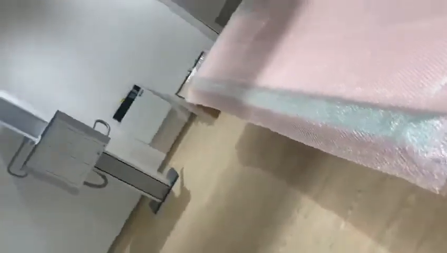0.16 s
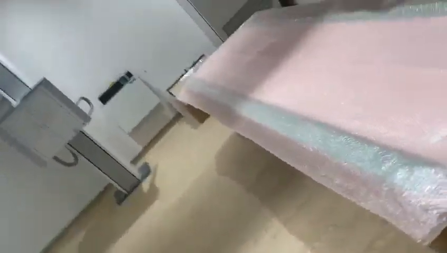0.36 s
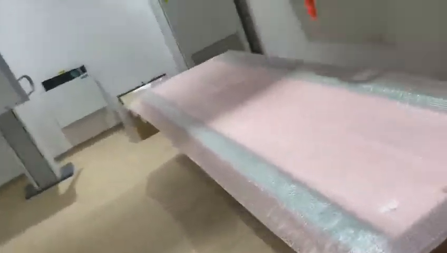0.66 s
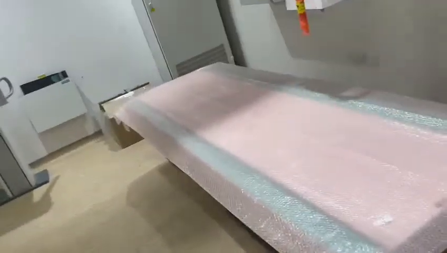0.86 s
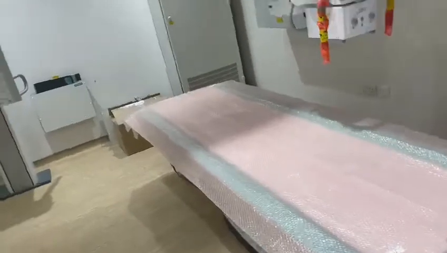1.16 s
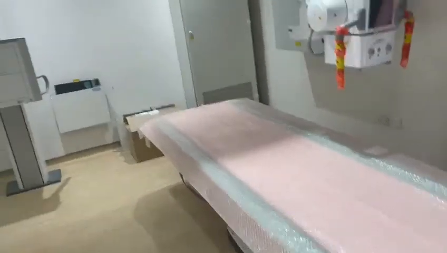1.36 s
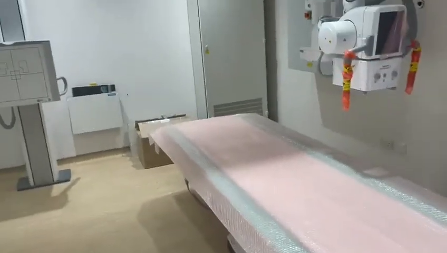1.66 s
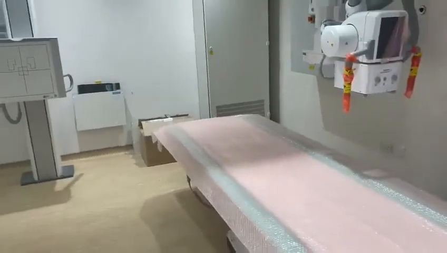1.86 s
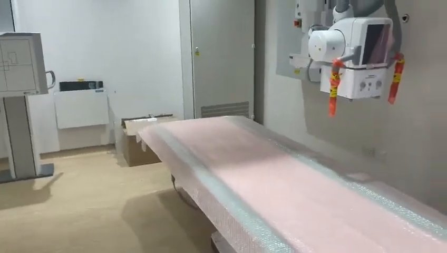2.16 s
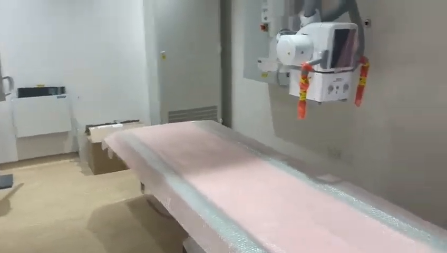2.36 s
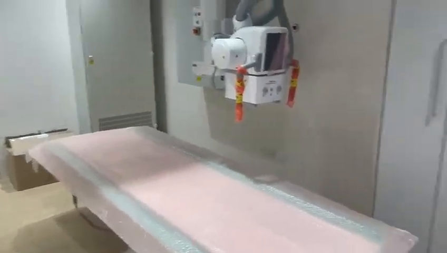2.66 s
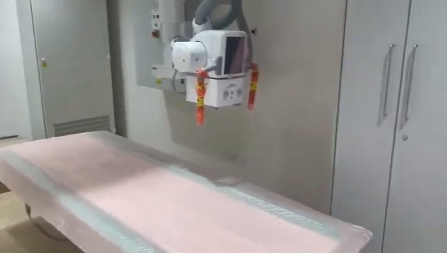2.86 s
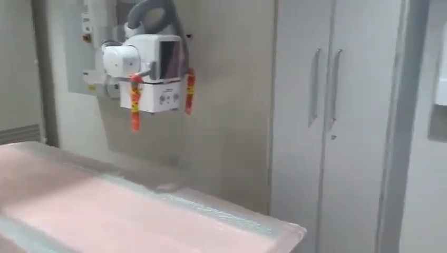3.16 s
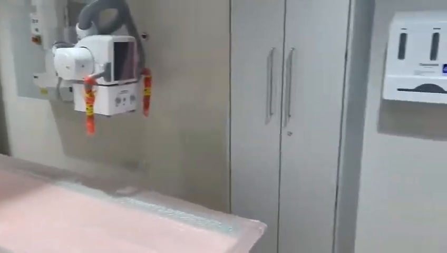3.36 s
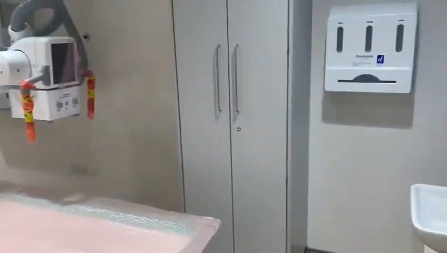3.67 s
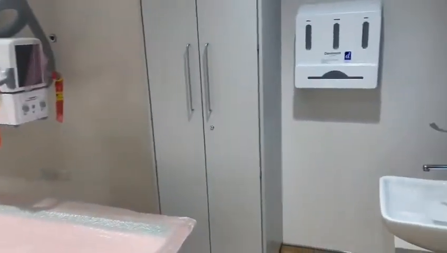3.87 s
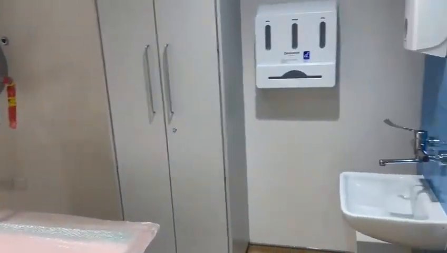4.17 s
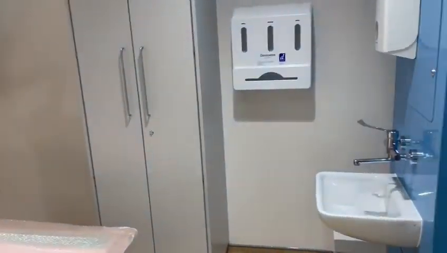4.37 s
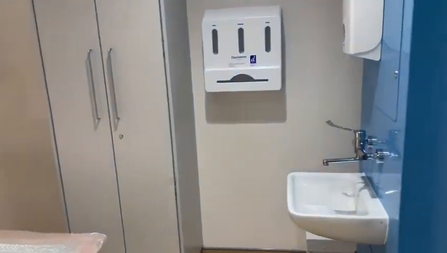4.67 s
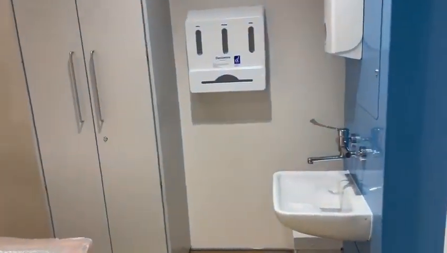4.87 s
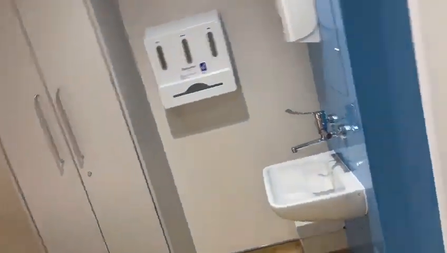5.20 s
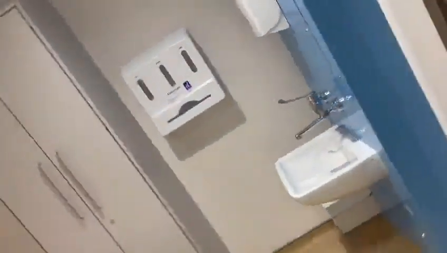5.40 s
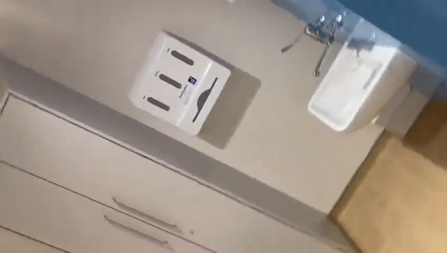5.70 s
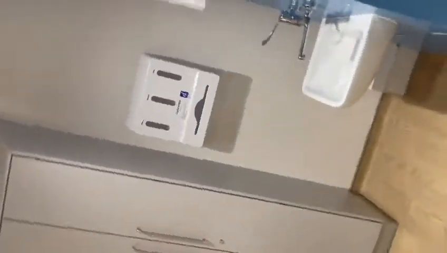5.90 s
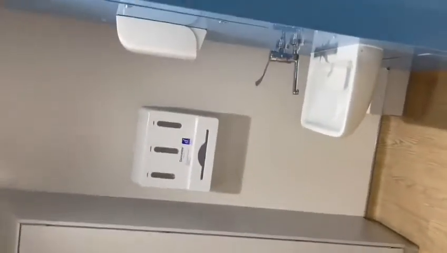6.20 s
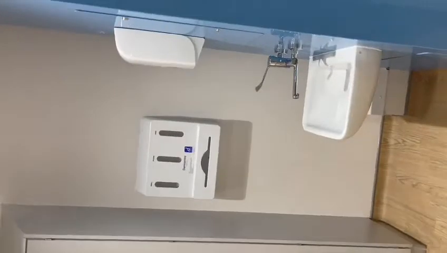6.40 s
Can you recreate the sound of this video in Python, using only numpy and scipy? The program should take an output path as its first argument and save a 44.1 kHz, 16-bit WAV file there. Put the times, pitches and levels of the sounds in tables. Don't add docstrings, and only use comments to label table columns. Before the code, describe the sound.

In a quiet hard-walled treatment room, cloth rustles and a phone case pops softly before a door bangs shut, followed by a few small clicks.

```python
import sys
import numpy as np
from scipy import signal
from scipy.fft import rfft, irfft, next_fast_len
from scipy.io import wavfile
from scipy.ndimage import uniform_filter1d, minimum_filter1d

SR = 44100
rng = np.random.default_rng(int(sys.argv[2]) if len(sys.argv) > 2 else 0)


def rack_gain(trim_db):
    fader = np.asarray(trim_db, float)
    return 10 ** (fader / 20)


def generate_wav(sig):
    pcm = np.round(np.clip(np.atleast_2d(sig).T, -1, 1) * 32767).astype(np.int16)
    wavfile.write(sys.argv[1], SR, pcm)


N = 288546

# time_s, level_db
AIR_LEVEL = [(0.0, -45.5), (1.0, -46.5), (2.4, -46.5), (3.6, -45), (4.8, -43), (5.2, -42), (6.54, -43.5)]
# pitch_hz, level_db (per Hz)
AIR_COLOUR = [(35, -33), (60, -1), (102, -1), (134, 0), (173, -10), (209, -7.5), (601, -15), (1290, -16.5),
              (1810, -30.5), (3340, -47), (4480, -62), (5310, -85.5), (9400, -82), (12200, -109),
              (20700, -120)]
# pitch_hz, width_hz, level_db
DUCT_HUMS = [(136.6, 26, 0.5), (210.4, 17.6, -3.5), (258.4, 29, -10), (325, 42, -17)]
AIR_MIDDLE_DB = -11.5

# start_s, length_s, level_db, brightness_db
SLEEVE_STROKES = [(0.0, 2.28, -76.5, -3.5), (2.305, .3, -81, -20), (2.6, 1.08, -85, -20),
                  (5.18, 1.32, -74, -1.5), (0.0, .06, -68, -5), (.197, .01, -72, -3), (0.31, .06, -70, 1),
                  (0.402, .02, -62.5, -2), (0.52, .045, -64, -1), (0.604, .07, -60.5, -1),
                  (0.807, .03, -68.5, -2), (0.873, .29, -71, 0), (1.254, .055, -63.5, -2.5),
                  (1.408, .09, -59, -5), (1.568, .015, -61.5, -2.5), (1.783, 0.14, -65, -7),
                  (1.96, .31, -73.5, -6), (2.726, .19, -73, -25), (2.86, .04, -73, -25),
                  (5.26, 0.045, -61.5, 2), (3.646, .03, -74, -1), (4.886, .005, -90, -20),
                  (5.219, .19, -60.5, 0), (5.43, .39, -65, -3.5), (5.835, .025, -59.5, -2.5),
                  (5.99, .035, -57.5, -6), (6.126, .015, -70.5, 0), (6.247, .02, -65, -3),
                  (6.34, .07, -67.5, -2.5), (6.42, .055, -59.5, -4.5)]
SLEEVE_RISE_DB_S, SLEEVE_FALL_DB_S, STILL_DB = 400, 330, -112
COARSE_DB, COARSE_SHARE, USUAL_DB, FAINT_DB = -1.5, 0.59, -68, -88
# start_s, length_s, level_db
GRIP_SHIFTS = [(.05, 0.018, -41), (.18, 0.074, -42), (.57, 0.025, -42.5), (.74, 0.1, -38.5),
               (.985, 0.0067, -33.5), (1.14, 0.068, -38), (1.28, 0.095, -33.5), (1.49, .03, -36),
               (1.77, 0.12, -35.5), (2.1, 0.061, -47.5), (2.29, .01, -46), (2.43, .06, -48),
               (2.8, .02, -49), (3.12, 0.08, -42), (3.33, .6, -45.5), (4.6, 0.12, -41.5), (4.94, .3, -48),
               (5.36, .01, -51), (5.53, .07, -45), (5.84, .02, -45), (6.02, .03, -44), (6.4, .08, -49)]
GRIP_RISE_DB_S, GRIP_FALL_DB_S = 161, 140

# start_s, level_db, end_pitch_hz, length_s, left_minus_right_db
CASE_SNAPS = [
    (0.1787, -37, 4200, 0.0003, -5),
    (.1786, -40, 1300, .0012, 5),
    (.179, -38.5, 580, 0.0073, 3),
    (.2438, -36.5, 4000, 0.0003, 4),
    (0.2437, -28.5, 1070, 0.001, 1),
    (.2437, -24.5, 300, 0.0059, 3),
    (0.2508, -25, 80, 0.019, 0),
    (5.565, -18, 490, 0.0095, 3.5),
    (6.016, -39.5, 810, 0.0068, -9),
    (6.022, -41, 2300, .0004, 5),
]
# start_s, level_db, end_pitch_hz, length_s, left_minus_right_db
CASE_TICKS = [
    (1.2552, -31, 560, 0.0069, 7),
    (1.2545, -38, 920, 0.0029, 5),
    (5.566, -43, 2640, 0.0021, -3),
    (5.5661, -33.5, 1620, 0.0024, 14),
    (5.717, -41, 860, .005, -3),
    (5.728, -37.5, 590, 0.0074, 11),
    (6.262, -37, 1760, 0.0026, 16),
    (6.2618, -44, 3500, 0.0012, -1),
    (6.262, -43, 2500, 0.0035, -7),
]
SNAP_FALL, TICK_FALL = 3.1, 1.4
POP_LAG_S = 0.00027

# start_s, crack_db, brightness_db (per octave), ring_db, thud_db
DOOR_BLOWS = [(3.845, -51.5, -3, -76, -57), (3.854, -46.5, 3.8, -49.5, -60.5),
              (3.883, -54, -10, -64.5, -57.5), (4.036, -48, 1.5, -55, -48),
              (4.055, -36, -4.5, -45.5, -43.5), (4.065, -51.5, 0.5, -56, -23), (4.099, -43, 4, -35, -43.5),
              (4.1046, -38, -4, -29.5, -39.5), (4.1082, -15, 1.5, -22.5, -28.5),
              (4.111, -29, -2.5, -20.5, -33), (4.1164, -22.5, -6.5, -21.5, -15.5),
              (4.127, -34, -6.5, -44.5, -6.5), (4.154, -34, -4, -36, -23.5),
              (4.198, -39.5, -3.5, -39.5, -20), (4.229, -41, -1.5, -44, -20.5),
              (4.241, -38.5, 0.5, -43.5, -14)]
# time_s, level_db
SEAL_SCRAPE = [
    (4.008, -78),
    (4.034, -43),
    (4.045, -52),
    (4.06, -40),
    (4.09, -49),
    (4.105, -50.5),
    (4.115, -91.5),
]
# pitch_hz, level_db
CRACK_COLOUR = [(150, -22.5), (260, 12), (450, 10.5), (750, 7.5), (1100, 16), (1900, 5), (2300, -3.5),
                (3000, -5), (4000, -2.5), (5000, -2), (6800, -5), (8800, -0.5), (10500, -4.5), (11800, -8)]
# pitch_hz, level_db, t60_s (time to fade by 60 dB)
BOOM_MODES = [(52.7, -22, .3), (61.75, -4.5, 0.73), (71.7, -6.5, 0.46), (82.6, -12.5, 0.43),
              (90.1, 1.5, 0.39), (129.5, -3, 0.43), (142.9, -5, .3), (150.2, -6.5, .45), (183, -10, 0.29),
              (208.7, -4.5, 0.29), (247, 6.5, 0.13)]
# pitch_hz, level_db, t60_s
RING_MODES = [(250, 3.5, 0.078), (381, 0, 0.05), (450, -5, .05), (565, -3, 0.08), (920, -9.5, 0.12),
              (1019, -6, .08), (1108, -7, .08), (1226, -10, 0.16), (1540, -8, .14), (1643, -5, .09),
              (1716, -5, 0.1), (1815, -7, 0.07), (2968, -11.5, 0.066), (8676, -9, 0.08)]
# pitch_hz, t60_s
ROOM_T60 = [(150, 0.48), (500, 0.78), (1200, 0.19), (3000, 0.56), (6000, 0.47), (9000, 0.31), (11500, .33)]
RING_TO_ROOM_DB, ECHO_DB = -18, 0.5
PUSH_S = 0.006
CRACK_S, CRACK_DOUBLES_DB = 0.0067, 22

# pitch_hz, mid_db, side_db
PORTS = [(60.3, -3.5, -34.5), (177, 0.5, -20.5), (347, 1.5, -4.5), (706, -1.5, -1), (1606, 0.5, -3),
         (2600, 2.5, -1), (4030, -1, -9), (5500, 0, -3), (6500, -2, -19.5), (7470, -5.5, -6.5),
         (8330, 0, -40.5), (8760, 2, -30.5), (9220, -1.5, -8.5),
         (9600, -2, 1), (9850, -27, 2), (10400, -27, 3), (10650, -2, 2), (11250, -1, -2),
             (11400, -2, -35), (11600, -9, -50), (12100, -50, -60)]
# pitch_hz, share (of the time)
SIDE_KEPT = [(1800, 1), (2600, .8), (3600, .5), (4500, .35), (5500, .6), (6600, .2), (7600, 0.71),
             (8300, .3), (9200, 0.94)]
TOP_HZ, TOP_MASK_DB = 9680, -42
CEILING = 0.9


def shaped(x, hz, db):
    size = next_fast_len(x.shape[-1])
    f = np.log(np.fft.rfftfreq(size, 1 / SR) + 1)
    gain = rack_gain(np.interp(f, np.log(hz), db))
    return irfft(rfft(x, size) * gain, size)[..., :x.shape[-1]]


def unit(x):
    return x / np.sqrt(np.mean(x ** 2))


def band(hz, width, size=N):
    b, a = signal.iirpeak(hz, hz / width, SR)
    once = signal.lfilter(b, a, rng.standard_normal((2, size)))
    return unit(signal.lfilter(b, a, once))


def walk(rate):
    k = int(SR / rate)
    steps = np.repeat(rng.standard_normal(N // k + 1), k)
    return 1.3 * uniform_filter1d(uniform_filter1d(steps, k), k)[:N]


def curves(table):
    s, *columns = np.transpose(table)
    return [np.interp(np.arange(N) / SR, s, c) for c in columns]


def strokes(table, rise_db_s, fall_db_s, extra_db=0):
    t = np.arange(0, N + 64, 64) / SR
    s, length, db = np.transpose(table)[:3, :, None]
    rise = rise_db_s * np.maximum(s - t, 0)
    fall = fall_db_s * np.maximum(t - s - length, 0)
    power = np.sum(rack_gain(db + extra_db - rise - fall) ** 2, axis=0) + rack_gain(STILL_DB) ** 2
    return np.interp(np.arange(N) / SR, t, 10 * np.log10(power))


def modes(table):
    t = np.arange(SR) / SR
    return sum(rack_gain(db) * np.sin(2 * np.pi * hz * t) * rack_gain(-60 * t / t60) for hz, db, t60 in table)


def air():
    level_db, = curves(AIR_LEVEL)
    hz, db = np.transpose(AIR_COLOUR)
    rush = []
    for h in 75 * 2 ** np.arange(0, 7.6, .5):
        gain = rack_gain(np.interp(np.log(h), np.log(hz), db) + 1.13 * walk(4.82)) * np.sqrt(h)
        rush.append(gain * band(min(h, 11500), h / 2.11))
    duct = sum(rack_gain(g_db + 2.0 * walk(4.1)) * band(f, width) for f, width, g_db in DUCT_HUMS)
    bass = unit(sum(rush[:6])) * rack_gain(-2) + duct * rack_gain(-4.5)
    upper = unit(sum(rush[6:])) * rack_gain(AIR_MIDDLE_DB)
    return (bass + upper) * rack_gain(level_db)


def hand():
    db = strokes(SLEEVE_STROKES, SLEEVE_RISE_DB_S, SLEEVE_FALL_DB_S)
    brightness_db = np.array(SLEEVE_STROKES)[:, 3:]
    top_db = strokes(SLEEVE_STROKES, SLEEVE_RISE_DB_S, SLEEVE_FALL_DB_S, brightness_db) - db
    low_db = COARSE_DB - COARSE_SHARE * (np.maximum(db, FAINT_DB) - USUAL_DB)
    moving = 1 - curves([(3.8, 0), (3.84, 1), (4.5, 1), (4.6, 0)])[0]
    slips = rack_gain(1.9 * walk(30) + 2.0 * rng.exponential(size=N))
    low = sum(band(hz, hz / 2) * rack_gain(2 * walk(7.5)) for hz in (1900, 3000, 4300)) * rack_gain(low_db - 3)
    fine_bands = ((6100, -6.0), (7600, 0.0), (8800, -16.0), (10600, 6.0 + np.maximum(top_db, -25)))
    high = sum(band(hz, hz / 4) * rack_gain(1.86 * walk(12) + g_db) for hz, g_db in fine_bands)
    grip_db = strokes(GRIP_SHIFTS, GRIP_RISE_DB_S, GRIP_FALL_DB_S) - 4.5
    thumps = (band(48, 30) + band(80, 50)) * rack_gain(grip_db)
    return (low + high) * unit(slips) * rack_gain(db) * moving + thumps


def pops():
    out = np.zeros((2, N))
    for table, fall in ((CASE_SNAPS, SNAP_FALL), (CASE_TICKS, TICK_FALL)):
        for s, db, end_hz, length, pan_db in table:
            u = np.arange(int(length * SR)) / (length * SR)
            hz = end_hz * (1 + (fall - 1) * (1 - u) ** 3.06)
            swell = np.sin(np.pi * u ** 0.8)
            pop = rack_gain(db) * swell * np.sin(2 * np.pi * np.cumsum(hz) / SR)
            for k, sign in enumerate((1, -1)):
                i = int((s + k * POP_LAG_S) * SR)
                out[k, i:i + len(u)] += pop * rack_gain(sign * pan_db / 2)
    return out


def echo():
    t = np.arange(SR) / SR
    f, t60 = np.transpose(ROOM_T60)
    hz = 150 * 2 ** np.arange(0, 6.6, .5)
    decay = np.interp(np.log(hz), np.log(f), t60)
    tail = sum(np.sqrt(h) * band(h, h / 2, size=SR) * rack_gain(-60 * t / d) for h, d in zip(hz, decay))
    tail = tail * (1 - np.exp(-t / 0.0032))
    return tail / np.sqrt(np.sum(tail[0] ** 2))


def door():
    t = np.arange(2048) / SR
    crack = rack_gain(curves(SEAL_SCRAPE)[0] + 3 * walk(150)) * rng.standard_normal((2, N))
    send, tap, push = crack.copy(), np.zeros(N), np.zeros(N)
    hardest_db = max(blow[1] for blow in DOOR_BLOWS)
    push_shape = np.sin(np.pi * np.minimum(t / PUSH_S, 1)) ** 2 * 2 / (PUSH_S * SR)
    for s, db, tilt_db, ring_db, thud_db in DOOR_BLOWS:
        i = int(s * SR)
        length = CRACK_S * 2 ** ((db - hardest_db) / CRACK_DOUBLES_DB)
        noise = rng.standard_normal((2, len(t)))
        click = np.sqrt(length * SR / 2) * (np.arange(len(t)) == 32)
        burst = np.vstack([noise * np.exp(-t / length), click])
        burst = rack_gain(db) * shaped(burst, [500, 16000], [0, 5 * tilt_db])
        crack[:, i:i + len(t)] += burst[:2]
        send[:, i:i + len(t)] += burst[2]
        tap[i] += rack_gain(ring_db)
        push[i:i + len(t)] += rack_gain(thud_db) * push_shape
    ring = signal.fftconvolve(tap, modes(RING_MODES))[:N]
    ring = np.array([ring, -1.2 * np.roll(ring, shift=8)])
    crack, send = shaped(np.array([crack, send]), *np.transpose(CRACK_COLOUR))
    wet = signal.fftconvolve(send + rack_gain(RING_TO_ROOM_DB) * ring, echo(), axes=1)[:, :N]
    boom = -signal.fftconvolve(push, modes(BOOM_MODES))[:N]
    return crack + ring + rack_gain(ECHO_DB) * wet + boom * np.array([[1], [1.4]])


def ports(pair):
    hz, mid_db, side_db = np.transpose(PORTS)
    mid, side = shaped(pair[0], hz, mid_db), shaped(pair[1], hz, side_db)
    return np.array([mid + side, mid - side])


def scene():
    return ports(air() + hand() + door()) + pops()


def thin_side(pair):
    mid_side = np.array([pair[0] + pair[1], pair[0] - pair[1]]) / 2
    f, t, (mid, side) = signal.stft(mid_side, SR, nperseg=1024)
    side_power = np.mean(abs(side[40:]) ** 2, axis=0)
    loud = np.clip((np.log10(side_power + 1e-12) + 8.5) / 2, 0, 1)
    share = np.interp(f, *np.transpose(SIDE_KEPT))[:, None] ** (1 - loud)
    dice = rng.random((len(f) // 10 + 1, len(t) // 4 + 1))
    dice = dice.repeat(10, axis=0).repeat(4, axis=1)[:len(f), :len(t)]
    side = side * (dice < share) / np.sqrt(np.clip(share, .05, 1))
    power = uniform_filter1d(abs(mid) ** 2, size=3)
    top = np.sqrt(power[f > TOP_HZ].sum(axis=0) / power.sum(axis=0))
    mid = mid * ((f[:, None] < TOP_HZ) | (top > rack_gain(TOP_MASK_DB + 8 * dice)))
    mid, side = signal.istft(np.array([mid, side]), SR, nperseg=1024)[1][:, :N]
    return np.array([mid + side, mid - side])


def roll_off(x):
    return signal.sosfilt(signal.butter(12, 12520, fs=SR, output="sos"), x)


def record(dry):
    bass_cut = signal.butter(4, 40, "high", fs=SR, output="sos")
    x = thin_side(signal.sosfilt(bass_cut, dry))
    gain = np.minimum(1, CEILING / (abs(x).max(axis=0) + 1e-9))
    gain = uniform_filter1d(minimum_filter1d(gain, size=256), size=128)
    return roll_off(x * gain)


dry = scene()
out = record(dry)
generate_wav(out)
```